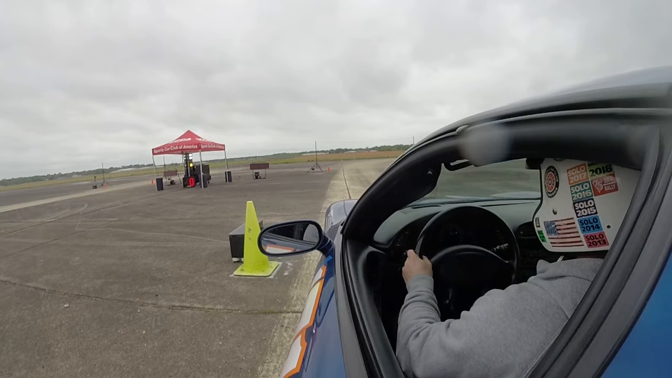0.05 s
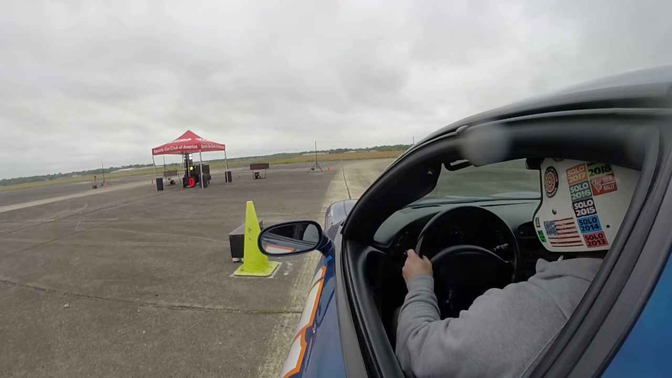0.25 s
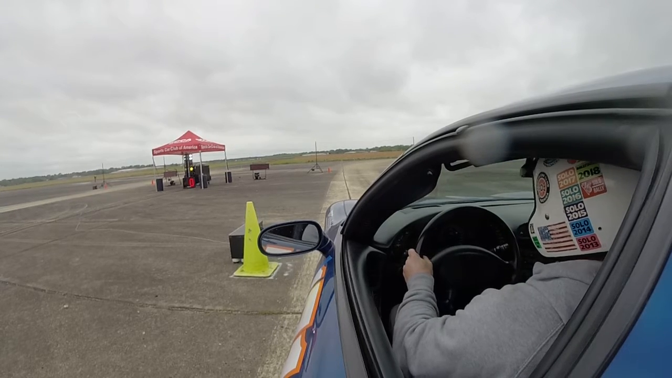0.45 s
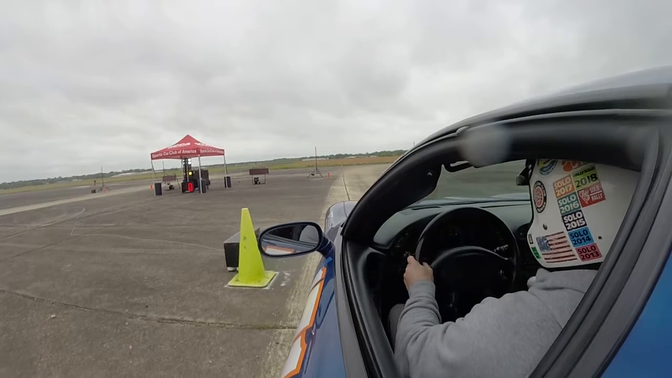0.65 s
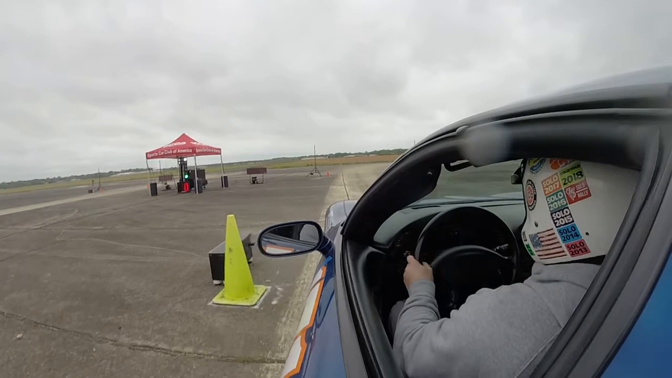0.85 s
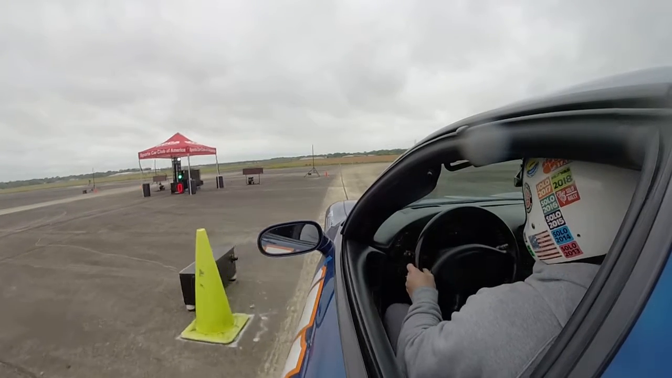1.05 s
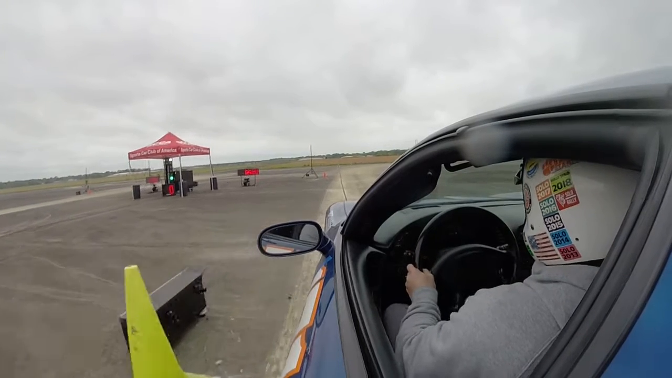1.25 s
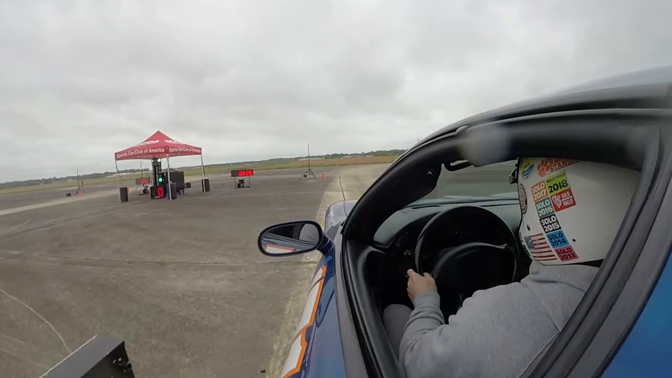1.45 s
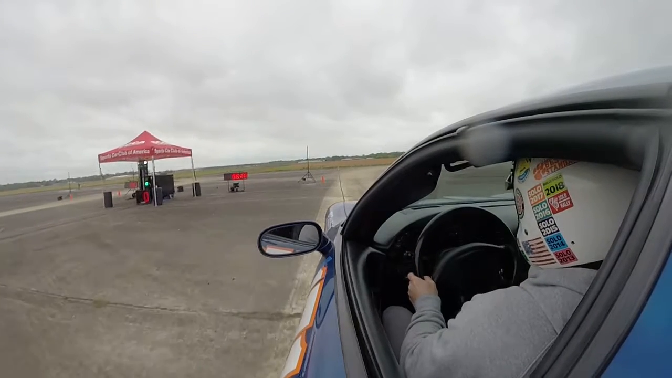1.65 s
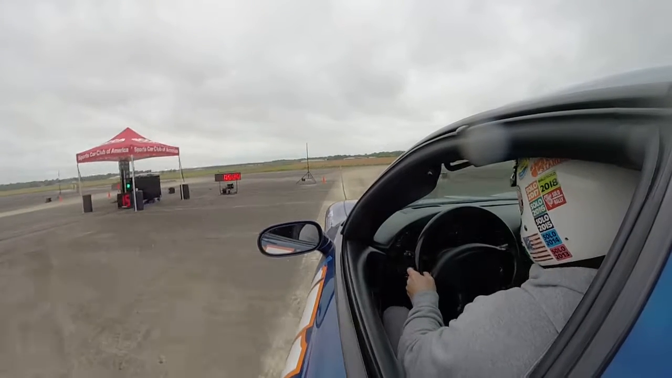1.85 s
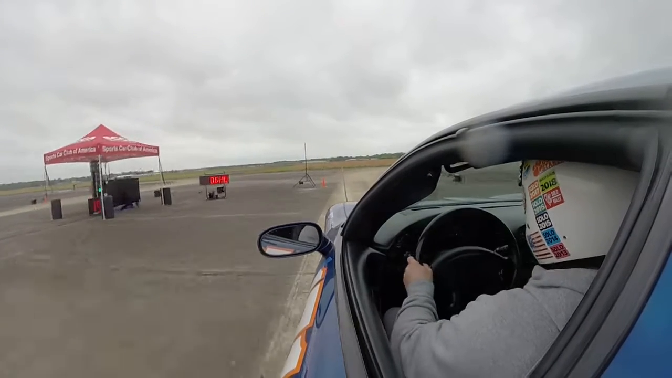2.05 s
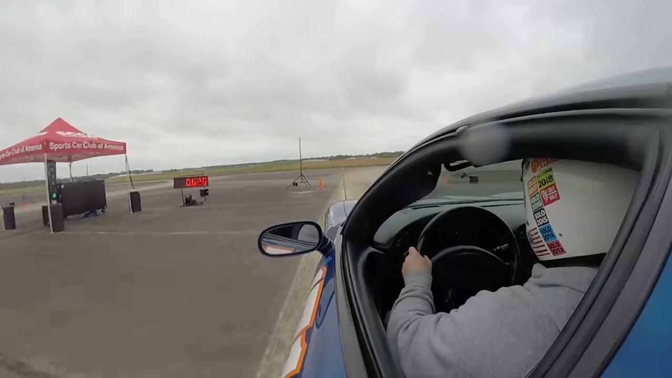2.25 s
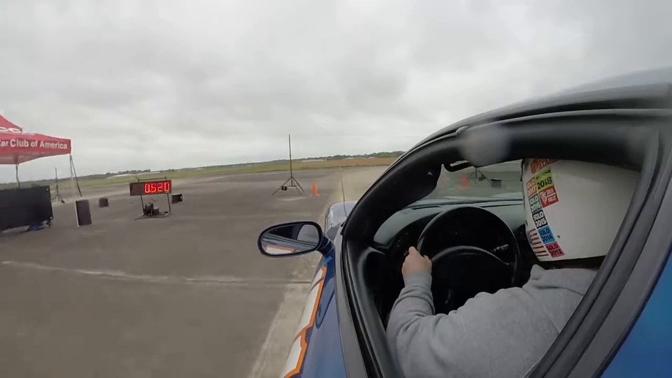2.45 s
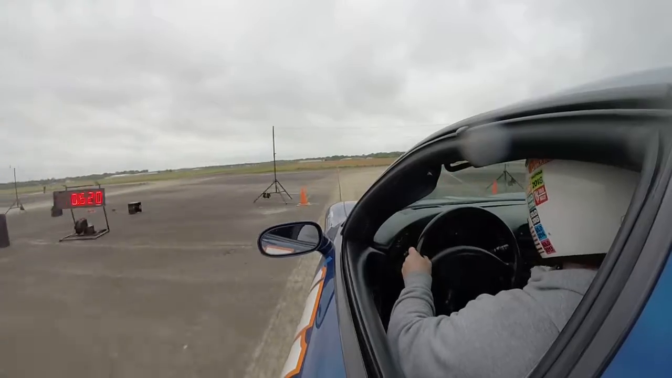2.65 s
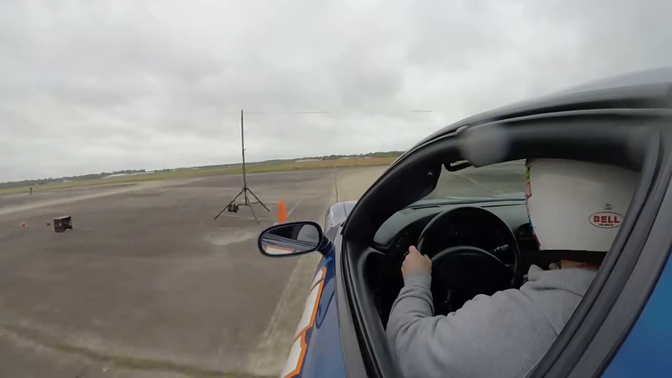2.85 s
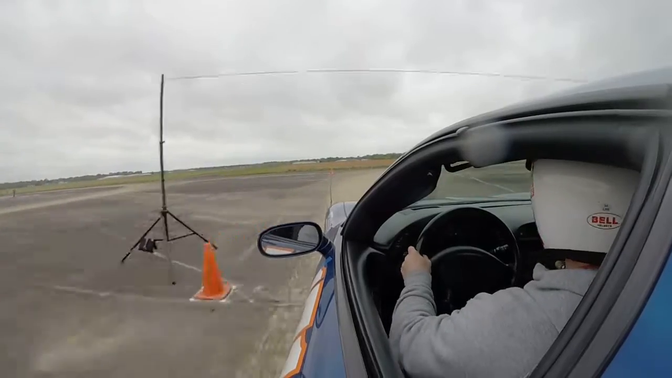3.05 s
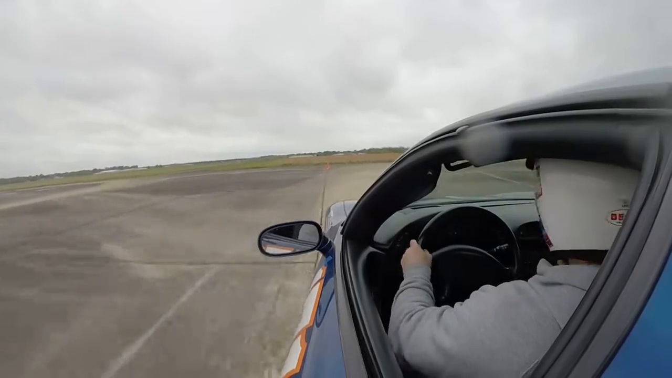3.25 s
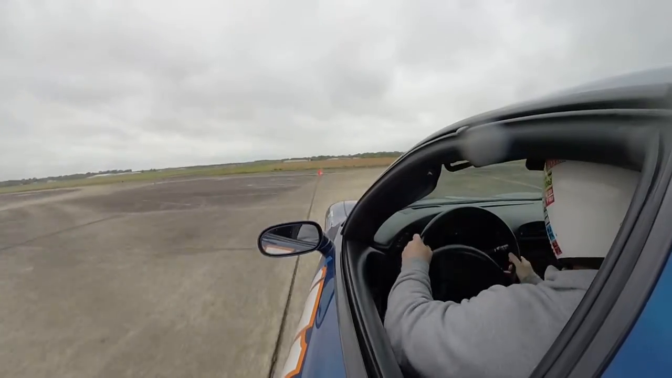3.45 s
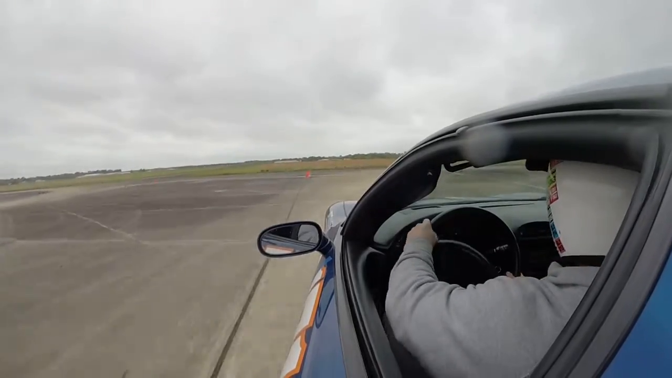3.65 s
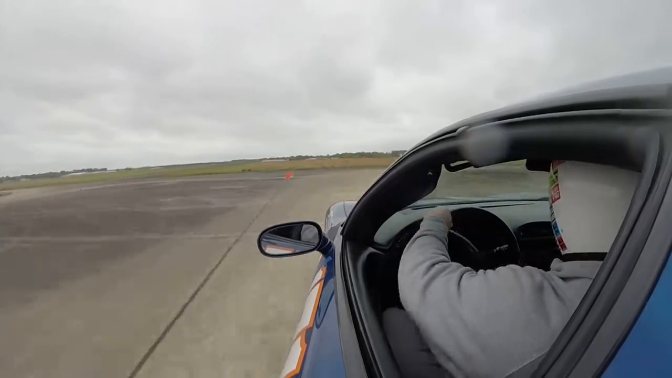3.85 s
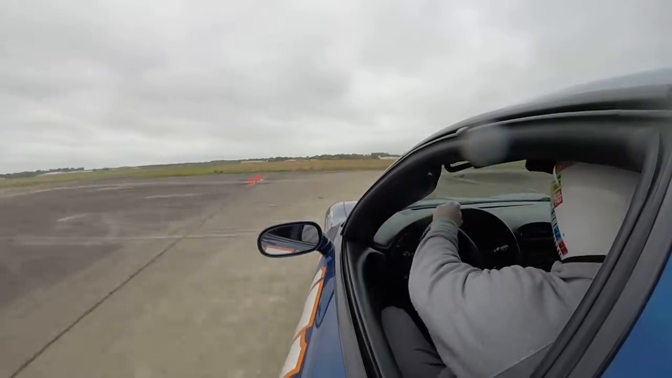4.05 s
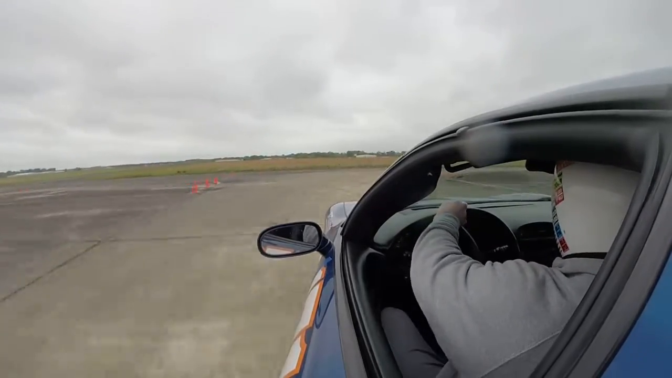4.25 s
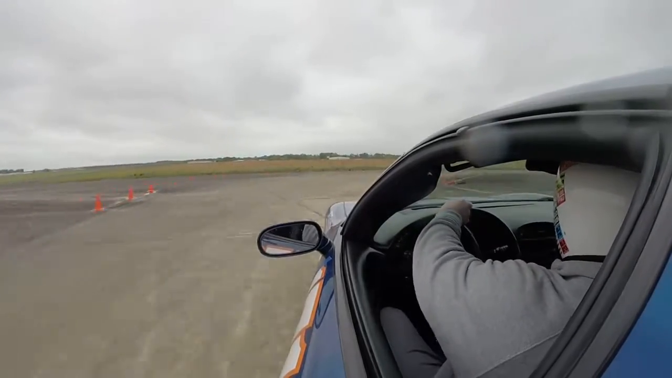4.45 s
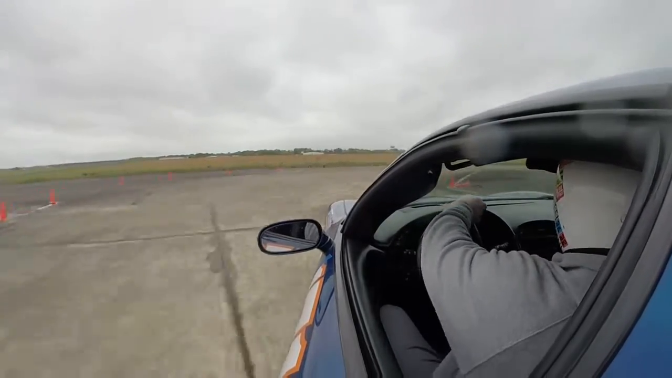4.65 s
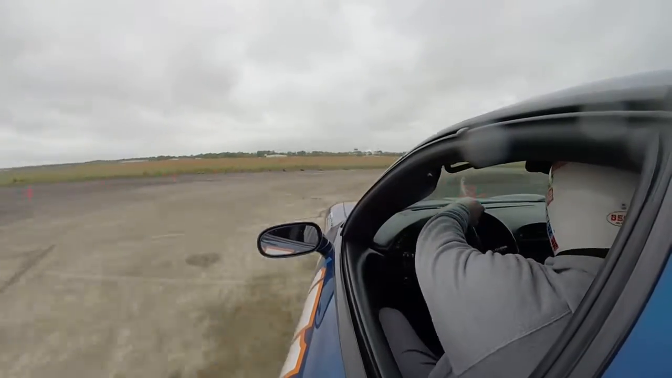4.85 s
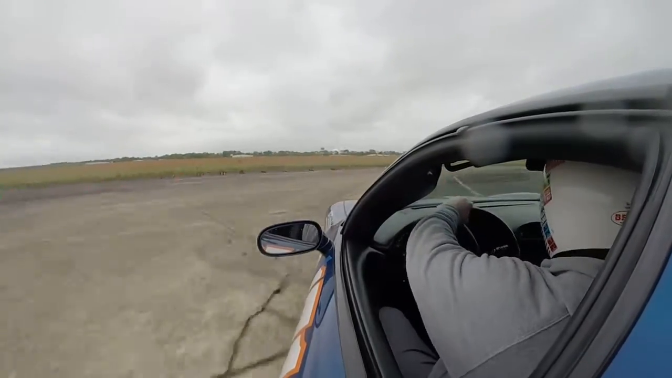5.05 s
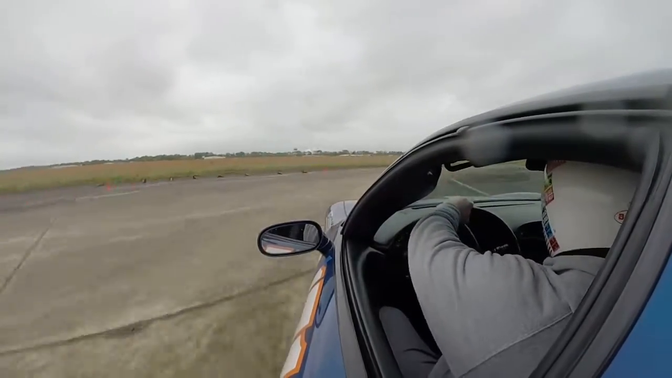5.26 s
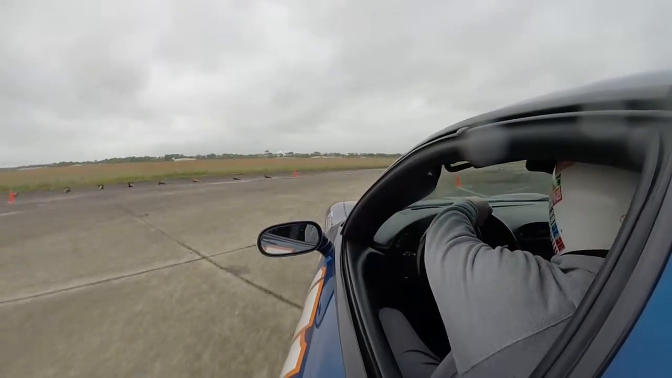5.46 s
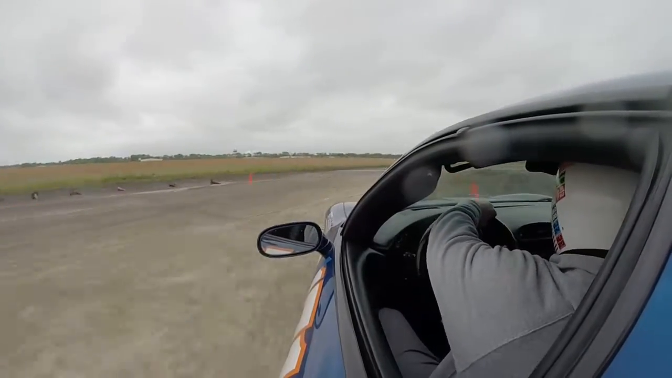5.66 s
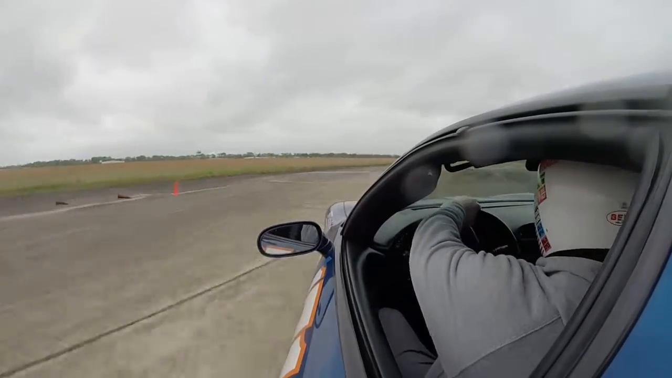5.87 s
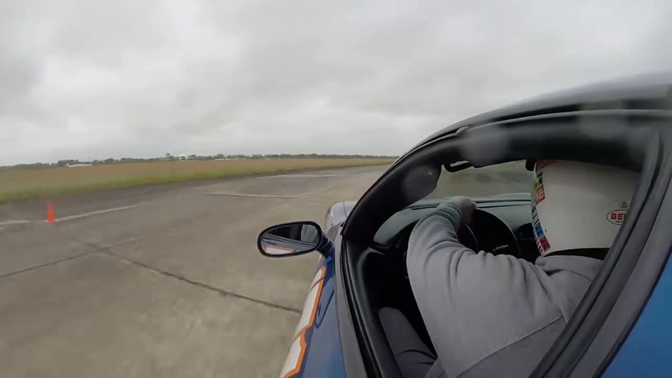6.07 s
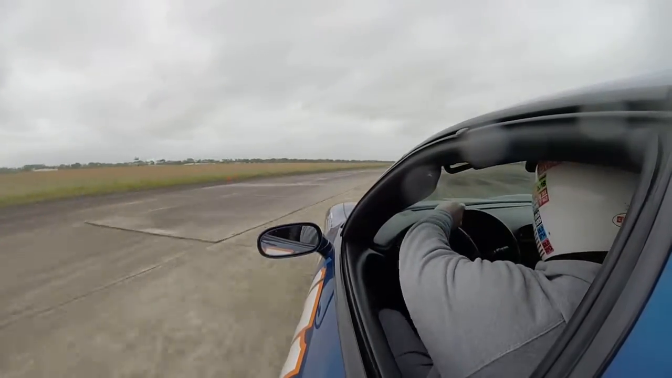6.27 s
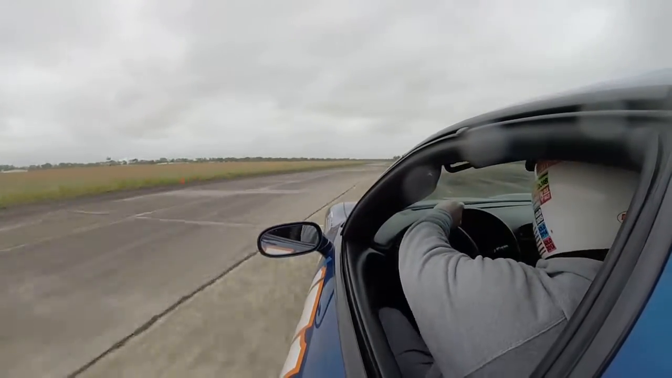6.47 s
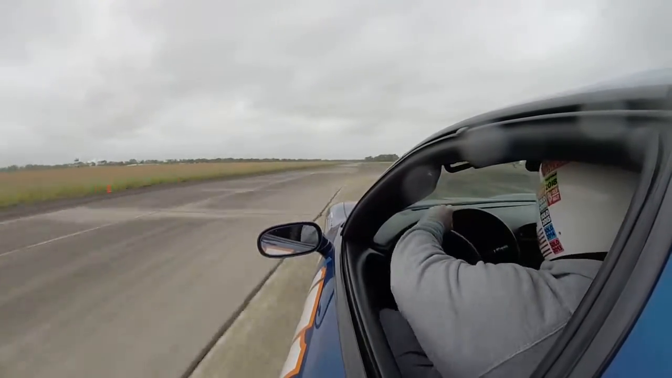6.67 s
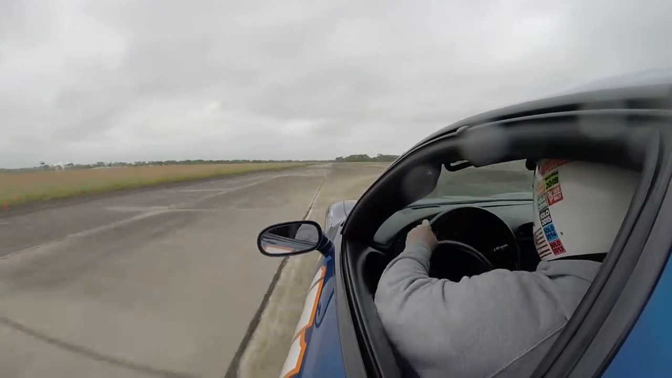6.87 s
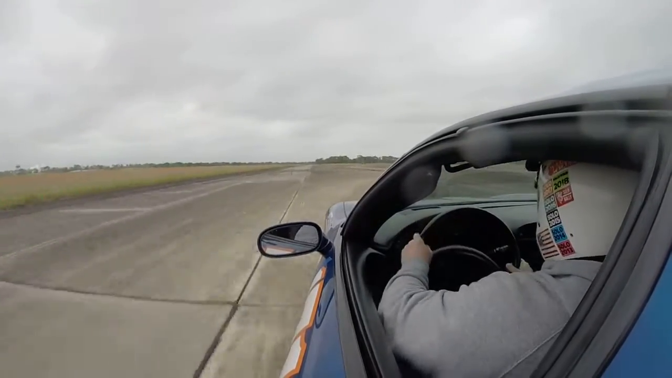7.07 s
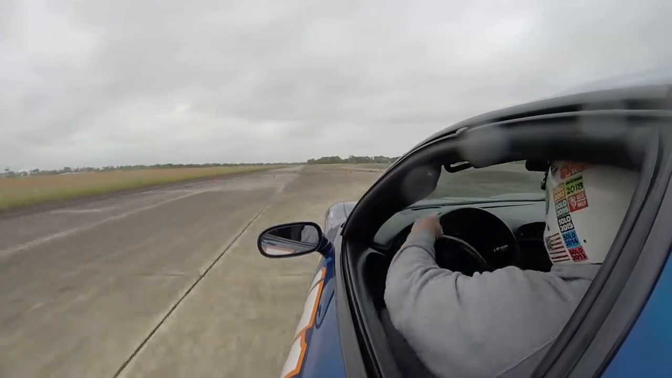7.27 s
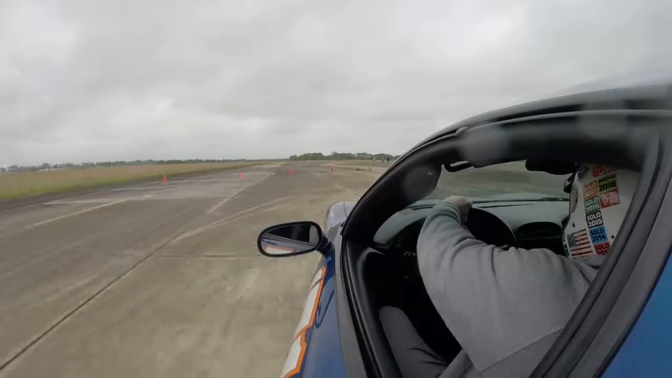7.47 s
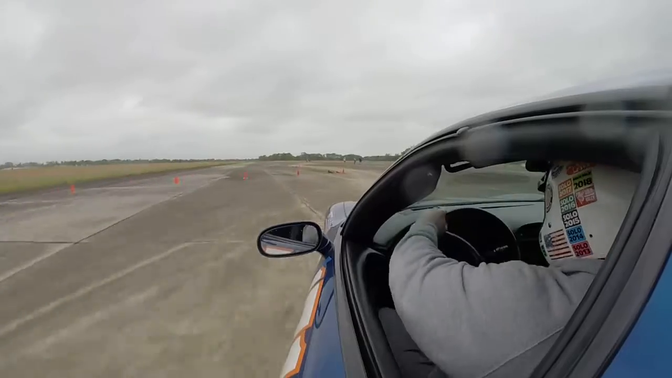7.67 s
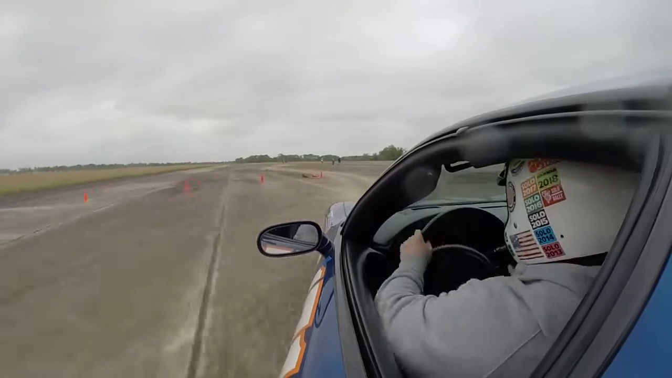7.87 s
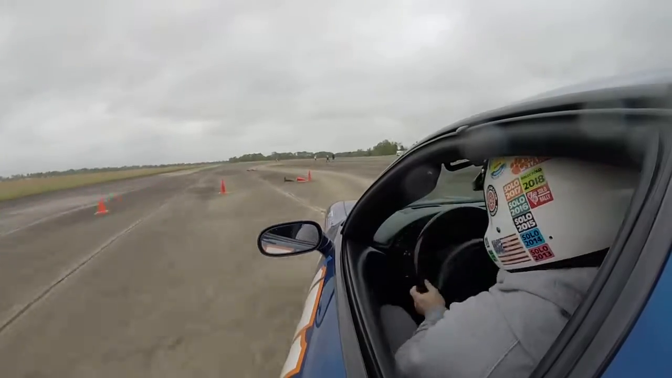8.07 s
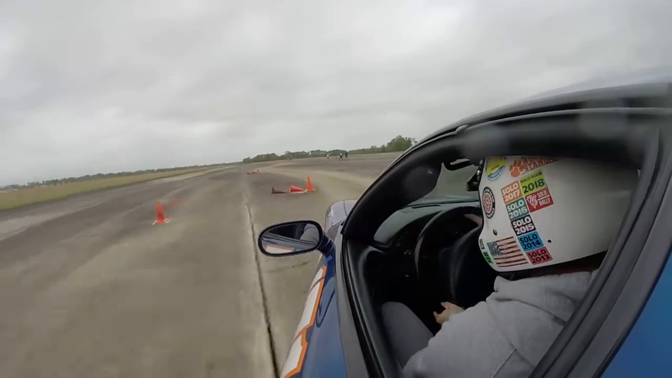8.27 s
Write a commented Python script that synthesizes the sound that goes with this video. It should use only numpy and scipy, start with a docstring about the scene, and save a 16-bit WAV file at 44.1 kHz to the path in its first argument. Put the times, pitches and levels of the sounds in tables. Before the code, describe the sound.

A V8 sports car hums at a raised idle with a faint whirr. At about 0.5 seconds the throttle opens with a dull knock, and from 0.8 to 1.4 seconds the spinning tyres give a stutter of chirps and a light spray of grit. The burbling exhaust sags near 2 seconds, then climbs strongly in pitch until an upshift just after 3 seconds. In second gear it rises more gradually, easing and pulling again to the end at about 8.3 seconds. Concrete rumbles underneath, and jolts make the microphone mount shudder deeply, with sharp overload clicks scattered between 0.7 and 3.5 seconds. The hardest jolts, near 2.9 and 4.7 seconds, briefly duck the whole sound. The microphone is outside the door, so wind roar and hiss build with speed, becoming heavy from about 4 seconds, with low buffets and booms from the open window.

```python
"""A V8 sports car engine idles, launches with spinning tyres and accelerates over concrete, shifting up
near 3 s. Its periodic exhaust pulses excite the resonances of pipe and body; the tyres chirp by stick-slip
friction and the road rumbles. At a camera outside the door, turbulence roars and hisses ever harder
with airspeed. Jolts make its mount shudder, and the overloaded sound clicks; on the hardest jolts
its limiter ducks everything."""
import sys
import numpy as np
from scipy import signal
from scipy.fft import rfft, irfft, next_fast_len
from scipy.io import wavfile
from scipy.ndimage import uniform_filter1d, minimum_filter1d, map_coordinates

SR = 44100
rng = np.random.default_rng(int(sys.argv[2]) if len(sys.argv) > 2 else 0)


def transcribe(u):
    """Save the signal u as a 16-bit wav file named by the first command-line argument.

    u: samples, shape (n,) or (channels, n), limited to [-1, 1]; the rate is SR.
    q: integer samples, one column per channel.
    """
    v = np.clip(np.atleast_2d(u).T, -1, 1)
    q = np.round(v * 32767).astype(np.int16)
    wavfile.write(sys.argv[1], SR, q)


N = 366912


def amp(db):
    """Amplitude ratio of a level in decibels."""
    return 10 ** (np.asarray(db) / 20)


def unit(x):
    """Normalisation to rms 1."""
    return x / np.sqrt(np.mean(x ** 2) + 1e-20)


def along(points, hz):
    """Interpolation of (frequency [Hz], level [dB]) points on a logarithmic frequency axis."""
    point_hz, point_db = np.transpose(points)
    return np.interp(np.log(hz + 1), np.log(point_hz), point_db)


def curves(rows):
    """Linear interpolation in time: one value per sample for each column after the first."""
    times, *columns = np.transpose(rows)
    return [np.interp(np.arange(N) / SR, times, column) for column in columns]


def fade(start, end):
    """Linear ramp from 0 to 1 between two times, at least 10 ms long."""
    return np.clip((np.arange(N) / SR - start) / max(end - start, .01), 0, 1)


def wobble(rate, count=8):
    """Smooth random modulation: a spline through `rate` Gaussian knots a second."""
    knots = rng.standard_normal(int(N * rate / SR) + 4)
    steps = np.arange(len(knots) * count) / count
    return np.interp(np.arange(N) * rate / SR, steps, map_coordinates(knots, [steps]))


def swells(rows, rise_db_per_s, fall_db_per_s, hop=32):
    """Exponential rise and decay around (time [s], level [dB], hold [s]) events; the strongest wins."""
    t = np.arange(0, N, hop) / SR
    levels = [db - rise_db_per_s * np.maximum(s - t, 0) - fall_db_per_s * np.maximum(t - s - hold, 0)
              for s, db, hold in rows]
    return np.interp(np.arange(N) / SR, t, amp(np.max(levels, axis=0)))


def filtered(x, response):
    """Linear filtering: the spectrum of x times a frequency response."""
    size = next_fast_len(N + SR // 2)
    return irfft(rfft(x, size) * response(np.fft.rfftfreq(size, 1 / SR)), size)[:N]


def noise(spectrum):
    """Spectrally shaped noise of rms 1, falling 12 dB an octave beyond the first and last points."""
    skirts = lambda hz: (np.minimum(hz / spectrum[0][0], 1) / np.maximum(hz / spectrum[-1][0], 1)) ** 2
    return unit(filtered(rng.standard_normal(N), lambda hz: amp(along(spectrum, hz)) * skirts(hz)))


def turning(hz):
    """Phase as the time integral of frequency, from a random starting angle."""
    return 2 * np.pi * np.cumsum(hz) / SR + rng.uniform(0, 2 * np.pi)


def idle(drift=0.014):
    """Periodic firing gives a line spectrum: a hum that creeps up in pitch until the throttle opens."""
    # partials at raised idle: (frequency [Hz], level [dB])
    partials = [(32.3, -19), (129.2, -45), (258.4, -35.5), (457.6, -50.5), (516.8, -54.5)]
    creep = 1 + drift * (fade(0, .45) - .5)
    hum = sum(amp(db + wobble(7.9)) * np.sin(turning(hz * creep)) for hz, db in partials)
    return np.sqrt(2) * hum * fade(0, 0.01) * (1 - fade(0.44, 0.87))


def whirr(level_db=-45):
    """Belts and fans under the bonnet radiate steady broadband noise."""
    # whirr spectrum: (frequency [Hz], relative level [dB])
    spectrum = [(300, 1), (650, -8), (1050, -8.5), (2200, -19.5), (3000, -28.5), (5000, -33), (8000, -41),
                (12000, -51)]
    return amp(level_db) * noise(spectrum)


def road(speed, jolt, parked_db=-38, rolling_db=-29, cruise_db=-24, exponent=0.58, thump_db=-25):
    """Concrete, low eddies and jolts rumble through the body; as incoherent sources they add in power."""
    # rumble spectrum: (frequency [Hz], relative level [dB])
    spectrum = [(42, -12), (62, -7), (85, -10), (108, -7), (135, -18.5), (200, -16), (300, -26.5),
                (450, -26.5), (620, -47)]
    rolling = amp(rolling_db) * fade(0.52, 0.53)
    parts = [amp(parked_db), rolling, amp(cruise_db) * speed ** exponent, amp(thump_db) * jolt]
    rumble = unit(noise(spectrum) * amp(1.5 * wobble(28)))
    return np.sqrt(sum(part ** 2 for part in parts)) * rumble


def exhaust(cycle_hz, load_db, firing_db=-4, rasp_db=-17, rasp_growth=0.59, puff_db=4,
            jitter=0.0029, scatter_rad=0.03, rough_db=3, firing_spread_db=1.2):
    """Source and filter: eight firings a cycle drive the pipe's resonances; uneven spacing adds burble."""
    # response of exhaust pipe and body: (frequency [Hz], gain [dB])
    pipe = [(85, 0), (112, 2), (140, -17), (172, 6.5), (200, 5), (225, -0.5), (265, 2.5), (305, -8),
            (355, -4.5), (395, -3.5), (445, 1.5), (490, -1.5), (550, -5.5), (620, -9.5), (900, 2)]
    # harmonics of the unevenly spaced pulses: (multiple of the cycle rate [1], relative level [dB])
    harmonics = [(4, -11), (5, -9.5), (6, -9), (9, -11), (10, -11.5), (11, -10), (12, -16), (13, -9.5),
                 (14, -14), (16, -10)]
    # rush of the exhaust gas: (frequency [Hz], relative level [dB])
    gas_spectrum = [(250, 1), (340, -17.5), (400, -9), (450, 4.5), (580, -11), (1000, -3.5), (1800, -27),
                    (6000, -62.5)]
    cycle = turning(cycle_hz * (1 + jitter * wobble(20)))
    firing = np.sin(8 * cycle)
    note = amp(firing_db + along(pipe, 8 * cycle_hz) + wobble(35)) * firing
    # scattered firing times smear the high harmonics most
    scattered = cycle + scatter_rad * wobble(30)
    tone = lambda k: np.sin(round(k) * scattered + rng.uniform(0, 2 * np.pi))
    burble = sum(amp(db + along(pipe, k * cycle_hz) + rough_db * wobble(16)) * tone(k)
                 for k, db in harmonics)
    tones = amp(load_db) * np.sqrt(2) * (note + burble)
    puffs = unit(noise(gas_spectrum) * amp(puff_db * firing + 2 * np.sin(cycle)))
    rasp = amp(rasp_db + rasp_growth * load_db) * puffs
    strength = unit(amp(firing_spread_db * wobble(150)))
    return strength * (tones + rasp) * fade(0.3, 0.58)


def wind(speed, roar_db=-24, hiss_db=-26, roar_exponent=2.04, hiss_exponent=2.58,
         flutter_db=0.88, tear_db=1.43, gust_db=0.62, notch_hz=4340, notch_db=-5):
    """Turbulence at the microphone: roar and hiss follow power laws of speed and flutter together."""
    # roar of the eddies: (frequency [Hz], relative level [dB])
    roar_spectrum = [(180, -18), (300, -7.5), (463, 0), (1000, 6), (1620, 4.5), (1910, -0.5), (2200, -6),
                     (2860, -44)]
    # hiss with the resonances of the housing: (frequency [Hz], relative level [dB])
    hiss_spectrum = [(1500, -13.5), (2150, -8), (2370, 2), (2620, -6.5), (4000, -14.5), (4400, -17),
                     (4900, -6), (6300, -19.5), (9500, -35.5), (11000, -30.5), (15000, -50.5)]
    eddies_db = flutter_db * wobble(45) + tear_db * wobble(260) + gust_db * wobble(12)
    roar = unit(noise(roar_spectrum) * amp(eddies_db + 0.33 * wobble(20)))
    # one narrow band cancels in the microphone port
    port = lambda hz: amp(notch_db * np.exp(-((hz - notch_hz) / 100) ** 2))
    hiss = unit(filtered(noise(hiss_spectrum) * amp(eddies_db), port))
    return amp(roar_db) * speed ** roar_exponent * roar + amp(hiss_db) * speed ** hiss_exponent * hiss


def tyres(load_db, scrub_db=-8.5, rubber_db=-3, squeal_db=-3, judder_db=1.3, surge_db=1.2, waver=0.0143):
    """Stick-slip friction: rubber scrubs under load in first gear; spinning, it chirps and throws grit."""
    # slips of the driven tyres: (time [s], level [dB], hold [s])
    wheelspin = [(.75, -31, 0.09), (.845, -19.5, .07), (.95, -19.5, 0.045), (1.035, -19.5, .03),
                 (1.085, -24, 0.035), (1.143, -21.5, 0.03), (1.203, -22, .012), (1.249, -23, 0.009),
                 (1.318, -23.5, .033), (1.39, -32.5, 0.13)]
    # friction noise of the rubber: (frequency [Hz], relative level [dB])
    rubber_spectrum = [(440, -4), (600, -11.5), (1040, -2), (1400, -14), (1720, -13), (1900, -33),
                       (2300, -20), (2800, -48), (3650, -30), (4200, -53)]
    # modes of the sliding tread: (frequency [Hz], relative level [dB])
    tread_modes = [(895, -3.5), (1037, -1), (1120, -4.5)]
    # one long spray of grit: (time [s], level [dB], hold [s])
    spray_burst = [(.9, -44.5, .15)]
    # hiss of the grit: (frequency [Hz], relative level [dB])
    grit_spectrum = [(3000, 2), (3700, 3.5), (4400, -1), (5300, -0.5), (8500, -18), (12000, -42)]
    scrub = amp(load_db + scrub_db) * fade(0.54, 0.554) * (1 - fade(3.15, 3.2))
    spin = swells(wheelspin, rise_db_per_s=596, fall_db_per_s=220)
    spray = swells(spray_burst, rise_db_per_s=55, fall_db_per_s=40) * noise(grit_spectrum)
    slips = unit(amp(judder_db * wobble(220) + surge_db * wobble(59.7)))
    ring = unit(sum(amp(db + 2.7 * wobble(40)) * np.sin(turning(hz * (1 + waver * wobble(90.5))))
                    for hz, db in tread_modes))
    friction = amp(rubber_db) * np.hypot(scrub, spin) * noise(rubber_spectrum)
    return slips * (friction + amp(squeal_db) * spin * ring + spray)


def chassis_knocks(width_s=0.005, spread_hz=170):
    """Heavily damped vibration: the chassis gives short, dead knocks as it takes the load."""
    # knocks: (time [s], level [dB], frequency [Hz])
    knocks = [(.543, -25, 1170), (1.766, -31, 1900), (1.765, -40, 3550), (2.149, -24, 1850)]
    t = np.arange(N) / SR
    pulse = lambda s: np.exp(-np.minimum(((t - s) / width_s) ** 2, 20))
    return sum(amp(db) * pulse(s) * np.sin(turning(hz + spread_hz * wobble(1200))) for s, db, hz in knocks)


def mount_shudder(jolt, mount_hz=32.62, wander=0.0903, tremble_db=-20.5, lump_db=4.3, jolt_lump_db=2.5):
    """Resonance: the camera mount's one low mode trembles as the car rolls and swings wide on jolts."""
    swing = unit(np.sin(turning(mount_hz * (1 + wander * wobble(20)))))
    tremble = amp(tremble_db + lump_db * wobble(16)) * fade(0.6, 0.75)
    shake = jolt * unit(amp(jolt_lump_db * wobble(22)))
    return np.hypot(tremble, shake) * swing


def overload_clicks(gain_db=1, t60_s=0.012, repeat_s=0.005, repeat_db=-12):
    """Overload on big low swings is heard as sharp clicks: noise bursts at set times, each doubled."""
    # clicks: (time [s], level [dB], high-pass cutoff [Hz])
    clicks = [(0.679, -26, 2200), (1.574, -30, 3000), (1.835, -20, 4200), (1.871, -26, 3500),
              (1.964, -24.5, 3000), (2.1465, -14.5, 1500), (2.178, -25, 1400), (2.87, -22, 1500),
              (2.8755, -10, 7500), (2.9956, -18.5, 3000), (3.4815, -11.5, 8000)]
    # response that colours the clicks: (frequency [Hz], gain [dB])
    colour = [(900, -5), (1900, 10.5), (4000, -5.5), (5200, 0), (9000, -20), (11500, -16), (15000, -33)]
    age, bursts = np.arange(SR // 20) / SR, np.zeros(N)
    decay = lambda s: (age >= s) * amp(-60 * np.maximum(age - s, 0) / t60_s)
    envelope = decay(0) + amp(repeat_db) * decay(repeat_s)
    for s, db, cutoff_hz in clicks:
        burst = amp(db) * envelope * rng.standard_normal(len(age))
        high_pass = signal.butter(2, cutoff_hz, "high", fs=SR)
        bursts[round(s * SR):][:len(age)] += signal.lfilter(*high_pass, burst)
    return filtered(bursts, lambda hz: amp(gain_db + along(colour, hz)))


def buffeting(speed, cabin_db=-33, flutter_db=2.5):
    """Body heaves and gusts give deep pressure swings; air at the open window excites cabin resonance."""
    # heaves and gusts: (time [s], level [dB], hold [s])
    heaves = [(.7, -20, 0.045), (.97, -21, 0.079), (1.77, -24.5, 0.045), (2.1, -18, 0.048),
              (2.85, -21, .03), (3.13, -26.5, 0.3), (4.03, -27, 0.1), (4.19, -20.5, 0.064),
              (4.5, -20.5, 0.12), (6.89, -18, 0.033), (7.05, -21, 0.24), (7.68, -22.5, 0.4)]
    # deep buffet: (frequency [Hz], relative level [dB])
    buffet_spectrum = [(58, 4), (75, -0.5), (110, -0.5), (140, -11), (260, -13), (600, -36.5)]
    # booms through the open window: (time [s], level [dB], hold [s])
    booms = [(4.48, -23, .055), (5.5, -27, .2), (5.98, -24.5, 0.1), (7.5, -28.5, 1)]
    # cabin resonance: (frequency [Hz], relative level [dB])
    cabin_spectrum = [(130, -16), (165, -6.5), (190, 2.5), (215, -7.5), (270, -13.5), (700, -45)]
    swell = lambda rows: swells(rows, rise_db_per_s=300, fall_db_per_s=170)
    buffet = swell(heaves) * unit(noise(buffet_spectrum) * amp(flutter_db * wobble(20)))
    cabin = np.hypot(swell(booms), amp(cabin_db) * speed) * noise(cabin_spectrum)
    return buffet + cabin


def scene(cruise_m_per_s=24):
    """Superposition: sources driven by engine load, airspeed and jolts sum at the one microphone."""
    # launch, first gear, upshift, second gear: (time [s], four-stroke cycle rate [Hz], load level [dB])
    engine = [(.45, 18.6, -33), (.6, 21.4, -26), (.88, 21.8, -26), (1.12, 26.4, -27.5), (1.45, 22.1, -29.5),
              (1.7, 20.3, -30.5), (1.88, 21.7, -33), (2.04, 26.3, -37.5), (2.22, 26, -34),
              (2.45, 28.3, -29), (2.65, 31.2, -25.5), (2.86, 35.2, -22.5), (2.9, 37.1, -28),
              (3.08, 39.7, -25.5), (3.18, 40, -38), (3.3, 29.8, -36), (3.75, 31.4, -31.5),
              (3.94, 33.9, -26.5), (4.1, 34, -32), (4.95, 36, -37), (5.6, 38, -30), (5.85, 38, -34),
              (6.5, 38.7, -27.5), (6.75, 41.5, -25), (7.12, 43.9, -26.5), (7.85, 43.5, -33),
              (8.15, 41.5, -28.5)]
    # air past the door: (time [s], speed [m/s])
    airspeed = [(.5, .4), (1, 8.1), (2.35, 7.6), (2.85, 12.9), (3.15, 12.3), (3.35, 15.4), (3.7, 15.4),
                (3.96, 18.5), (4.14, 17), (4.42, 21.7), (5.05, 18.5), (6.1, 23.3), (7.25, 20), (7.55, 23.7),
                (8.32, 23.3)]
    # jolts that shake the camera mount: (time [s], level [dB], hold [s])
    jolts = [(.75, -7, 0.042), (1.11, -7, 0.11), (1.33, -4.5, 0.024), (1.54, -6.5, .18),
             (1.81, -7.5, 0.061), (1.95, -8, 0.046), (2.115, -1.5, 0.024), (2.68, -12, 0.012),
             (2.884, 3, .004), (2.98, -4.5, 0.077), (3.45, -5, 0.16), (4.01, -3.5, 0.0093),
             (4.58, -10.5, .03), (4.745, 1.5, .005), (4.97, -8.5, 0.012), (5.19, -8, 0.058),
             (5.76, -10.5, 0.2), (6.24, -10, 0.44), (6.94, -10, 0.087), (7.69, -14, 0.17)]
    cycle_hz, load_db = curves(engine)
    speed = curves(airspeed)[0] / cruise_m_per_s
    jolt = swells(jolts, rise_db_per_s=359, fall_db_per_s=216)
    car = idle() + whirr() + exhaust(cycle_hz, load_db) + tyres(load_db) + road(speed, jolt)
    air = wind(speed) + buffeting(speed)
    return (car + air + mount_shudder(jolt) + overload_clicks() + chassis_knocks())[None]


def record(dry, ceiling=0.7, attack_s=0.0058, release_db_per_s=50, band_limit_hz=15150):
    """Peak limiting: the camera's gain drops on the largest swings and recovers slowly; then a low-pass."""
    window = max(int(attack_s * SR), 2)
    needed_db = np.minimum(0, 20 * np.log10(ceiling / (np.abs(dry[0]) + 1e-9)))
    recovery_db = release_db_per_s * np.arange(N) / SR
    gain_db = np.minimum.accumulate(needed_db - recovery_db) + recovery_db
    gain = amp(uniform_filter1d(minimum_filter1d(gain_db, window), window))
    return filtered(dry[0] * gain, lambda hz: hz < band_limit_hz)[None]


dry = scene()
out = record(dry)
transcribe(out)
```